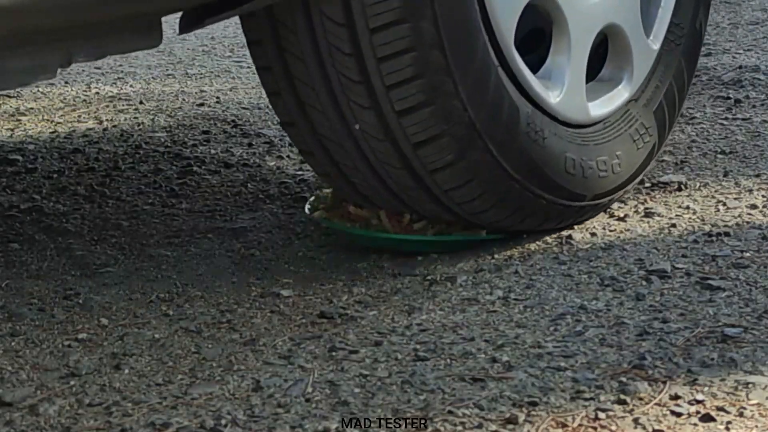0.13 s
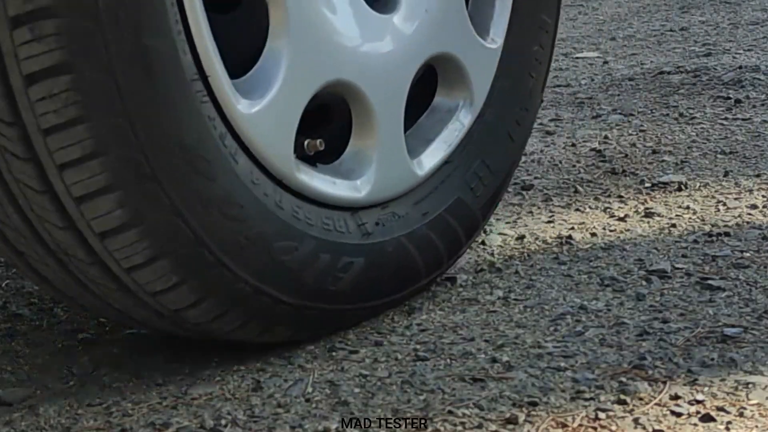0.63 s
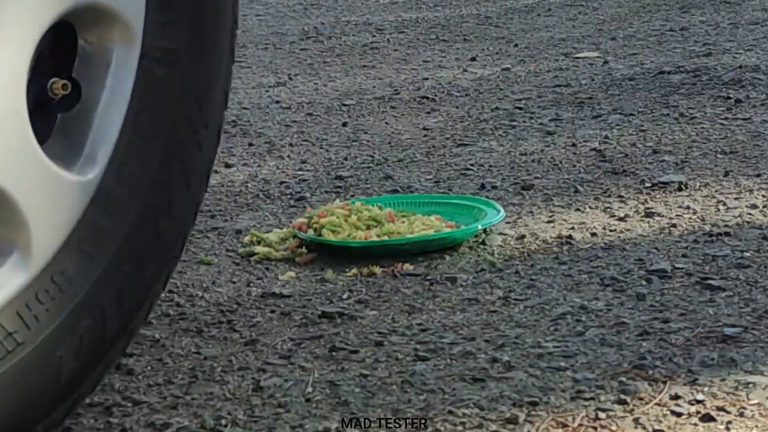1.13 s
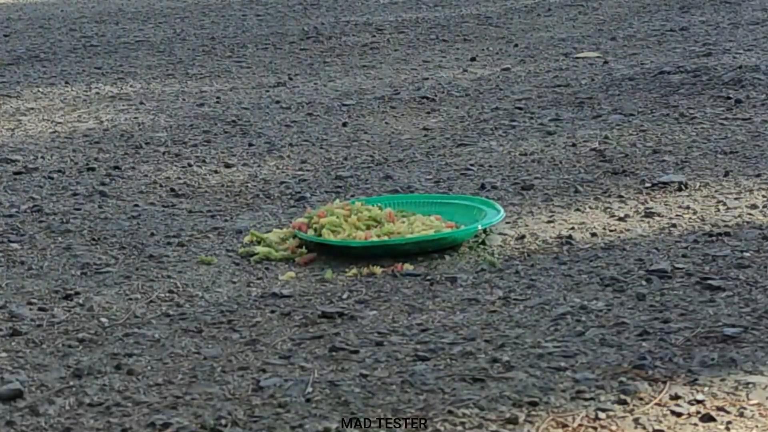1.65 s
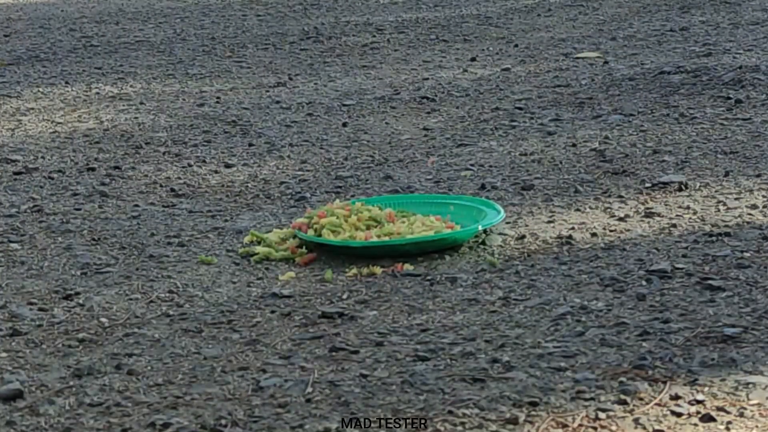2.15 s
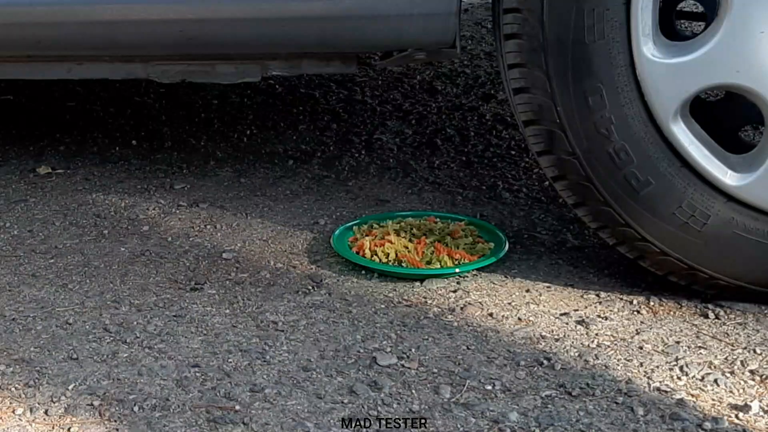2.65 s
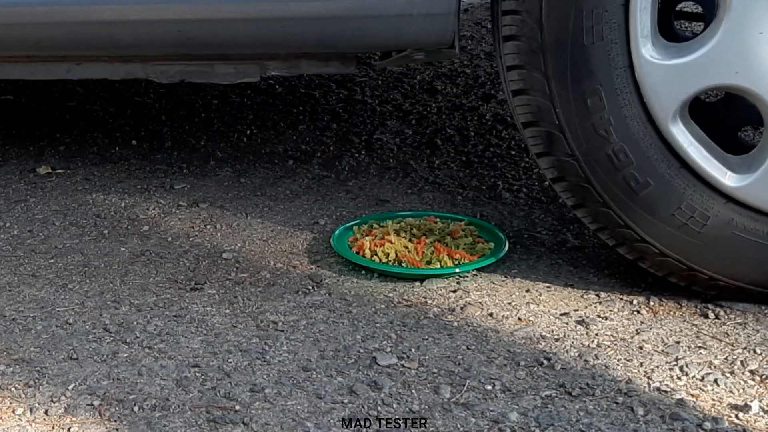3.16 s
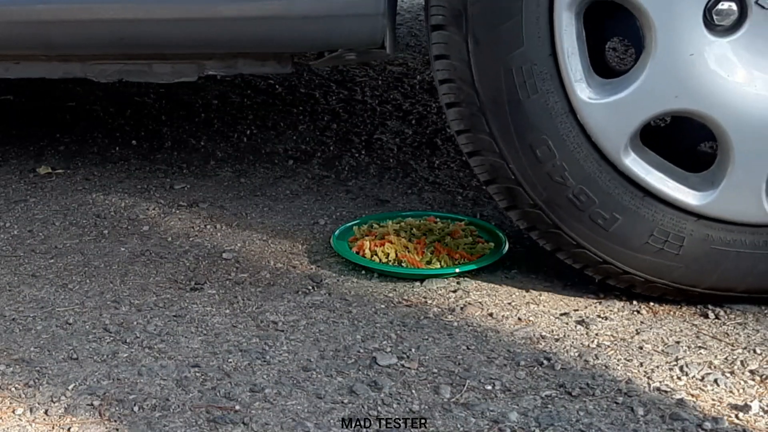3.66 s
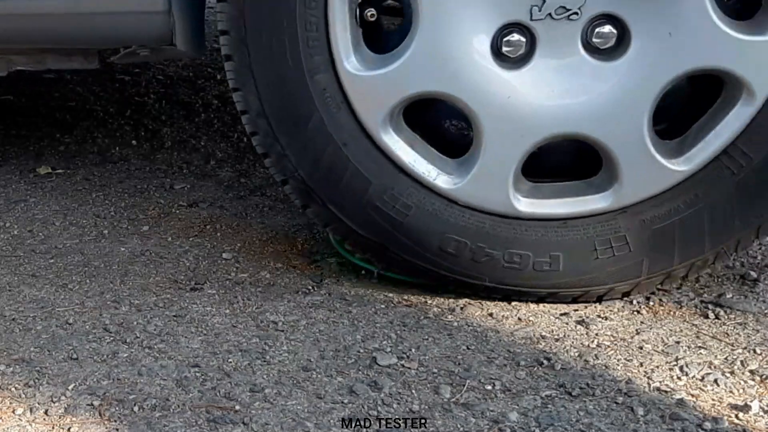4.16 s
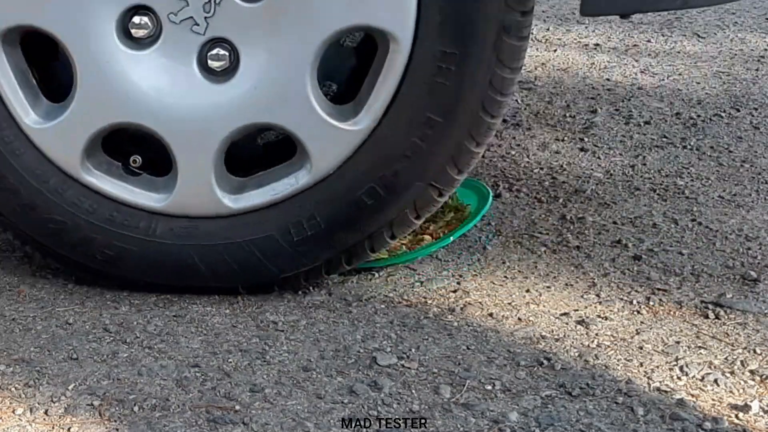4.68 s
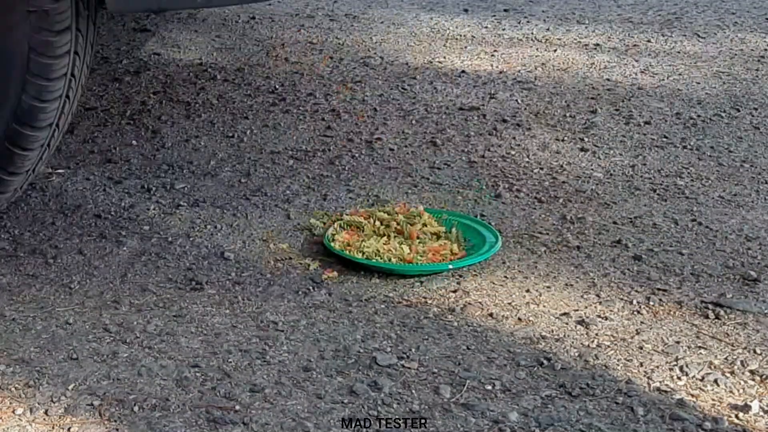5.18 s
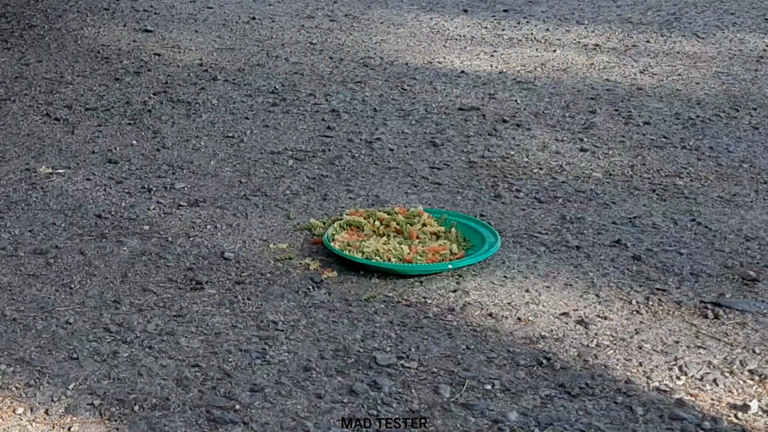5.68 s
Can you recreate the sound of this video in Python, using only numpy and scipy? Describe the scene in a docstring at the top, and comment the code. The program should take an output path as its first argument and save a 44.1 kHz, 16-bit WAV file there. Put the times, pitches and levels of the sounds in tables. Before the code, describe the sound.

Outdoors, close to the ground, a car idles low and soft while its tyre rolls slowly over gritty asphalt. Almost at once, from 0.03 to 0.55 s, dry pasta breaks under the tread: a dense, loud, brittle crackle packed with sharp snaps and hollow plastic knocks. It drops to coarse grit, with a brief crackling swell near 0.8 s, then sparse clicks leaning right; a very short, thin brake squeak comes at 1.2 s. Small grit ticks gather around 2.15 to 2.4 s. At about 2.5 s an abrupt cut makes everything quieter: dull engine rumble, faint hiss, barely audible high squeaks around 3.3 to 3.9 s and a few grit ticks. From 4.05 s the second plate is crushed, brighter and fiercer, with big snaps and a boxy ring until about 4.5 s. Crackles thin by 4.9 s, leaving tiny ticks and faint engine rumble to 5.8 s.

```python
"""A slow car rolls a tyre over a plastic plate of dry pasta on gritty asphalt, heard in two passes.
At the first spot the idling engine hums, and pasta crunches under the tread for the first half second:
noise-burst breaks and snaps ring the hollow plate. Sparse grit and a thin brake squeak follow.
From 2.485 s the second spot starts quieter, with faint squeaks and grit; the plate is crushed
at about 4.05 to 4.7 s, and the crackle thins out to the end."""
import sys
import numpy as np
from scipy import signal
from scipy.fft import irfft
from scipy.io import wavfile
from scipy.ndimage import uniform_filter1d, map_coordinates

SR = 44100
rng = np.random.default_rng(int(sys.argv[2]) if len(sys.argv) > 2 else 0)


def unload_wav(signal):
    """Save mono or channel-first audio to the path in sys.argv[1] as 16-bit WAV at rate SR, clipped to [-1, 1]."""
    wavfile.write(
        sys.argv[1],
        SR,
        np.round(np.clip(np.atleast_2d(signal).T, -1, 1) * 32767).astype(np.int16),
    )


def voltage_ratio(decibels):
    """Convert decibels (scalar or array-like) to amplitude ratios, 20 dB per decade."""
    exponent = np.asarray(decibels, float) / 20
    return 10 ** exponent


N = 256220
TIME = np.arange(N) / SR
SECOND_PASS_S = 2.485


def evened(x):
    """Scales to rms 1."""
    return x / np.sqrt(np.mean(x ** 2) + 1e-20)


def read_spectrum(points, hz):
    """Reads a spectrum on a log frequency axis."""
    f, value = np.transpose(points)
    return np.interp(np.log(hz + 1), np.log(f + 1), value)


def curves(tables):
    """Joins tables in time order and reads every column at each sample."""
    s, *columns = np.transpose(sorted(row for table in tables for row in table))
    return [np.interp(TIME, s, column) for column in columns]


def per_pass(make, tables):
    """Plays the first table up to the second pass and the second table from there."""
    return np.where(TIME < SECOND_PASS_S, make(tables[0]), make(tables[1]))


def add(mix, start_s, sound):
    """Mixes a sound in at its start time."""
    mix[round(start_s * SR):][:len(sound)] += sound


def resonate(x, hz, width):
    """A two-pole resonance of gain 1 at its centre."""
    return signal.lfilter(*signal.iirpeak(hz, hz / width, SR), x)


def steep(x, hz, width):
    """A resonance passed twice, for steep skirts."""
    return resonate(resonate(x, hz, width), hz, width)


def above(x, hz):
    """High-pass without delay."""
    return signal.sosfiltfilt(signal.butter(4, hz, "high", fs=SR, output="sos"), x)


# likeness of open air at the left and right microphones: (pitch_hz, likeness [-1 to 1])
AIR_LIKENESS = [(60, .96), (150, .92), (300, .65), (640, .2), (1400, -.2), (3000, 0)]


def air(points):
    """Open air as random short-time spectra with drifting patches, partly shared by both microphones."""
    hz = np.fft.rfftfreq(2048, 1 / SR)
    a, b, c, d, patches = rng.standard_normal((N // 512 + 5, 1025, 5)).T
    patches = evened(uniform_filter1d(uniform_filter1d(patches, 16, 0), 6, 1))
    same = np.clip(read_spectrum(AIR_LIKENESS, hz), -1, 1)[:, None]
    left = a + 1j * b
    right = same * left + np.sqrt(1 - same ** 2) * (c + 1j * d)
    level_db = read_spectrum(points, hz)[:, None] + 1.5 * patches
    spectra = np.array([left, right]) * voltage_ratio(level_db)
    return evened(signal.istft(spectra, nperseg=2048, noverlap=1536)[1][:, :N])


# colour of engine and open air, one list per pass: (pitch_hz, relative level_db per Hz)
AIR_COLOUR = [
    [(15, -47.5), (25, -41.5), (92, -1.5), (166, -7), (384, -3.5), (775, -21), (962, -9), (1290, -15),
     (4490, -25.5), (5570, -31.5), (8140, -27.5), (12500, -37), (16000, -60.5)],
    [(15, -69), (25, -38), (102, 3), (256, -12), (363, -8), (531, -22.5), (575, -7.5), (677, -19.5),
     (796, -12.5), (1130, -20), (1700, -21.5), (2550, -34), (16000, -73)],
]
# nearness of the engine, one list per pass: (time_s, level_db)
ENGINE_NEARNESS = [
    [(0, -43), (.34, -40.5), (.81, -43), (2.48, -41.5)],
    [(2.49, -48.5), (3.12, -47), (4.23, -46), (4.58, -52.5), (5.35, -56), (5.81, -48)],
]
# wavering engine tones: (pitch_hz, relative level_db)
ENGINE_TONES = [(91.5, -54.5), (113.0, -55.5), (226.1, -57), (290.7, -63.5), (366.1, -59.5), (576.0, -69.5)]


def engine():
    """Idle rumble with tones of narrow-band noise, which waver; its level follows the nearness."""
    hum = sum(voltage_ratio(db) * evened(resonate(rng.standard_normal(N), hz, 5.5)) for hz, db in ENGINE_TONES)
    # the side the car stands on: left-right dB, first and second pass
    pan_db = np.where(TIME < SECOND_PASS_S, -1, 3) * np.array([[.5], [-.5]])
    rumble = voltage_ratio(-1.0) * per_pass(air, AIR_COLOUR) + voltage_ratio(-5.0) * evened(hum)
    return voltage_ratio(curves(ENGINE_NEARNESS)[0] + pan_db) * rumble


# where the tyre is, one list per pass: (time_s, left_late_ms, left_minus_right_db)
TYRE_PLACE = [
    [(0, 0.032, -0.5), (.9, 0.051, -1), (1.1, .22, -11.5), (1.6, .4, -5.5), (2.48, .5, -2.5)],
    [(2.49, .5, -5), (3.4, 0.505, -2.5), (3.7, .05, 3.5), (4.3, 0.075, 3), (4.8, .011, 2), (5.2, -.11, 1.5),
     (5.81, -.51, 3)],
]


def placed(x, lean=1.):
    """Places sound at the tyre by the left microphone's delay and a level tilt, scaled by lean."""
    late_ms, pan_db = curves(TYRE_PLACE)
    left = map_coordinates(x[0], [np.arange(N) - late_ms * SR / 1000], order=3)
    return np.array([left * voltage_ratio(lean * pan_db / 2), x[1] * voltage_ratio(-lean * pan_db / 2)])


# how hard the tread grinds, one list per pass: (time_s, crackle level_db)
# grit while rolling, a plateau on the pasta, a second swell as the tread lifts off
TREAD_LOAD = [
    [(0, -45.5), (.02, -29.5), (.025, -20), (.044, -25), (.065, -18), (.135, -21), (.17, -19), (.43, -21),
     (.462, -23.5), (.48, -19.5), (.53, -28), (.57, -34), (.6, -36), (.66, -32), (.71, -35), (.76, -36.5),
     (.812, -24.5), (.885, -34), (.96, -47), (1.15, -56.5), (1.45, -52.5), (1.7, -46.5), (1.95, -47),
     (2.2, -48), (2.33, -50.5), (2.45, -50), (2.48, -53)],
    [(2.49, -71), (3.0, -79.5), (3.3, -77), (3.46, -65.5), (3.55, -65.5), (3.565, -49.5), (3.63, -56.5),
     (3.67, -66), (3.7, -53), (3.8, -57), (3.95, -57.5), (3.984, -33), (4.028, -48), (4.046, -23),
     (4.06, -28.5), (4.1, -21.5), (4.31, -20.5), (4.4, -26), (4.45, -24), (4.485, -31), (4.51, -28.5),
     (4.58, -37.5), (4.7, -42), (4.8, -37.5), (4.82, -30), (4.89, -39.5), (4.94, -45.5), (5.0, -60.5),
     (5.3, -61), (5.6, -57), (5.7, -54.5), (5.81, -52)],
]
# the tread touches the plate: (start_s, end_s)
PLATE_CONTACT = [(.03, 0.681), (4.049, 4.71)]


def tread():
    """Crackle level, and the plate ring, grit thud and finest snaps that follow from it."""
    load_db = curves(TREAD_LOAD)[0]
    second = (TIME >= SECOND_PASS_S).astype(int)
    over_full_db = load_db + 20  # crackle is at -20 dB with the whole plate under the tread

    def following(level_db, slope):
        """Level at full load, and dB per dB of load, for each pass."""
        return np.take(level_db, second) + np.take(slope, second) * over_full_db

    plate_db = following([-26.5, -23.5], [0.68, 0.98])
    grit_db = following([-40.5, -41], [.25, 0.59])
    fine_db = following([-26.5, -23.5], [1.434, 1.27])  # the finest snaps need weight
    # the plate is pinned and freed as it buckles, so its ring comes and goes
    flex_n = round(.02 * SR)
    flex = evened(uniform_filter1d(uniform_filter1d(rng.standard_normal(N), flex_n), flex_n))
    on_s, off_s = .09, 0.012  # the ring fades in within the contact and out just after it
    touch = sum(np.clip(np.minimum((TIME - start) / on_s, (end - TIME) / off_s + 1), 0, 1)
                for start, end in PLATE_CONTACT)
    ringing = touch * voltage_ratio(plate_db + 2 * flex)
    return load_db, ringing, voltage_ratio(grit_db), np.maximum(fine_db, -94)


def ring(x, modes):
    """The plate's modes, rung by blows; two passes narrow a resonance, so each is made wider."""
    return sum(voltage_ratio(db) * evened(steep(x, hz, 1.57 * width)) for hz, width, db in modes)


def coloured(x, points):
    """Applies a spectrum and evens the level."""
    hz = np.fft.rfftfreq(1024, 1 / SR)
    taps = np.roll(irfft(voltage_ratio(read_spectrum(points, hz))), 512) * np.hanning(1024)
    return evened(signal.oaconvolve(x, taps[None], "same", axes=1))


# colour of breaking pasta and grit, one list per pass: (pitch_hz, relative level_db per Hz)
BREAK_COLOUR = [
    [(710, -24.5), (1200, -6), (1750, -5.5), (2300, -9), (4080, -3), (5970, -4.5), (7170, -8), (8260, -4.5),
     (11300, -7.5), (16000, -19)],
    [(710, -28.5), (1200, -27.5), (1380, -1), (2180, -6), (2560, -3.5), (4500, 0.5), (7740, -8),
     (8630, -16.5), (11800, -9), (16000, -16.5)],
]
# modes of the plate and the hollow under the car, one list per pass:
# (pitch_hz, width_hz, relative level_db)
PLATE_MODES = [
    [(287, 48, -6.5), (468, 230, -6.5), (772, 320, -1.5), (978.5, 88, -9)],
    [(420, 304, -11), (528, 65, -1.5), (610, 41, -8), (961, 47, -30), (969, 62, 3.5)],
]


def crunch(kinds=range(120)):
    """Countless small breaks, denser under more load, each kind from its own spot across the tread."""
    load_db, ringing, thudding, fine_db = tread()
    per_s = np.clip(2500 * voltage_ratio(0.34 * (load_db + 23.0)), 700, 6000)
    # pieces give way in clumps, loose grit more so
    clumps = evened(uniform_filter1d(uniform_filter1d(rng.standard_normal(N), 500), 500))
    per_s_now = per_s * np.exp(np.interp(load_db, [-55, -25], [.55, .2]) * clumps)
    size_draw, break_draw, kind_draw = rng.random((N, 3)).T
    spread_db = np.interp(load_db, [-55, -25], [3.0, 4.5])  # heavy load breaks bigger pieces
    happens = break_draw < per_s_now / SR
    size = voltage_ratio(-spread_db * np.log(1 - .98 * size_draw)) * happens / np.sqrt(per_s)
    size /= voltage_ratio(1.4 * spread_db)

    kind = (kind_draw * len(kinds)).astype(int)
    breaks = np.zeros((2, N))
    t = np.arange(800) / SR
    for k in kinds:
        spot, length = rng.random(2)
        hz = 1200 * 12 ** (k / len(kinds))
        shape = rng.standard_normal(800) * voltage_ratio(-60 * t / (.004 + .014 * length))
        shape = evened(shape) + 0.37 * evened(resonate(shape, hz, 0.92 * hz))
        one = signal.oaconvolve(size * (kind == k), shape)[:N]
        breaks += [np.roll(one, round(7 * (spot - .5))), one]  # up to about 3 samples between ears

    brittle = per_pass(lambda points: coloured(breaks, points), BREAK_COLOUR)
    fine, bright = above(brittle, 8200), above(brittle, 3700)
    bright_gain = voltage_ratio(0.53 * (fine_db - load_db + 3.0))  # dulls along with the finest snaps
    body = brittle - bright + bright_gain * (bright - fine)
    plate = per_pass(lambda modes: evened(ring(size, modes)), PLATE_MODES)  # the whole plate rings as one
    thud = evened(steep(size, 650, 1100))  # the dull thud of grit
    hollow = ringing * plate + thudding * thud
    # the hollow sound is the least one-sided
    return (placed(voltage_ratio(load_db) * evened(body))
            + placed(voltage_ratio(fine_db) * evened(fine), lean=0.8)
            + placed([hollow] * 2, lean=.35))


def burst(hz, width, t60, noise, click=5.6):
    """A break: a click of a cycle or two, then a weaker rattle of splinters dying around one pitch."""
    t = np.arange(len(noise)) / SR
    x = steep(noise * voltage_ratio(-60 * t / t60) + click * (t == 0), hz, width)
    return x / abs(x).max()


# loud single snaps: (start_s, crack level_db, crack pitch_hz, knock level_db over crack, knock pitch_hz)
LOUD_SNAPS = [(0.0231, -17.5, 3970, -18, 1030), (0.0493, -7, 3130, -21.5, 1300),
              (0.0761, -6, 1750, -12, 1240), (0.0984, -6.5, 3640, -32, 1130), (0.1536, -15, 3610, -8, 713),
              (0.1724, -6.5, 3410, -5.5, 840), (0.1907, -5.5, 2960, -7.5, 930),
              (0.2063, -12, 1690, -26, 891), (0.2279, -25.5, 1820, -2, 1140),
              (0.2324, -17, 2960, 10.5, 880), (0.2392, -7, 2920, -19.5, 724),
              (0.2508, -7.5, 1770, -19, 861), (0.2794, -18, 4000, -9, 964), (0.2904, -9, 3690, -15, 939),
              (0.305, -11, 3230, -2.5, 695), (0.3251, -48, 3350, 3, 778), (0.3444, -16.5, 4410, -8.5, 745),
              (0.3624, -7.5, 4330, -2, 760), (0.3804, -14.5, 1710, -9.5, 729),
              (0.4033, -7.5, 4360, -8.5, 666), (0.4264, -0.5, 5990, -12.5, 799),
              (0.4777, -11.5, 1740, 1.5, 750), (0.4924, -9.5, 1670, -14, 435),
              (0.4984, -13, 3320, -11, 880), (0.5144, -28.5, 1390, 19, 790), (0.5746, -16, 1740, -2.5, 990),
              (0.5858, -17, 1380, 1, 435), (0.625, -26, 3890, -13, 1230), (0.6334, -25, 1300, -1, 1220),
              (0.6536, -20, 1620, -0.5, 600), (0.6804, -21, 1550, -7, 624), (0.8021, -13.5, 3310, -11, 600),
              (0.8204, -21, 3130, -28, 1130), (0.8684, -24, 1320, 7.5, 740), (0.9892, -28, 1760, -5.5, 735),
              (1.0495, -32.5, 1620, -1, 1180), (1.098, -37.5, 4170, 3, 566), (1.1382, -37, 1300, 13, 1000),
              (1.1443, -37.5, 1500, 19.5, 980), (1.2048, -32, 2660, -22, 476),
              (1.3203, -26.5, 6790, -17, 431), (1.3346, -26, 1370, -10, 463),
              (1.3533, -29.5, 2670, -21, 1170), (1.4454, -37, 2400, -6, 956), (1.5806, -37, 2120, -7, 506),
              (1.6591, -28, 2210, 4, 980), (1.719, -30.5, 1850, 0, 593), (1.8816, -27, 1650, 0, 1010),
              (1.9644, -25.5, 1790, -6, 630), (2.0054, -33, 2080, -18, 441), (2.139, -24, 4540, -15, 589),
              (2.1497, -25, 1750, -12, 460), (2.1635, -15.5, 3110, -4.5, 1320),
              (2.2964, -29, 1760, -5, 517), (2.3216, -17, 1760, -2.5, 500), (2.3314, -24, 2320, -4, 480),
              (2.3364, -25.5, 2380, 15.5, 950), (2.3438, -20.5, 1630, -8, 434),
              (2.3527, -18, 1690, -10, 1300), (2.3564, -34, 2080, 14, 732), (2.3643, -26.5, 1350, 3, 730),
              (2.438, -48, 1620, 2, 468), (2.4767, -27, 1300, 2, 1210), (3.0957, -57, 1530, 18, 598),
              (3.1063, -45, 1490, 14, 813), (3.117, -55.5, 1450, 16.5, 824), (3.1274, -55, 1780, 20, 805),
              (3.1392, -52, 1300, 11, 476), (3.5608, -39, 2950, -11, 571), (3.591, -42, 5280, -11, 713),
              (3.6174, -51, 1340, -4, 581), (3.696, -45, 1740, -9, 606), (3.7541, -27.5, 1620, -7, 620),
              (3.7727, -46, 1690, 2, 487), (3.829, -41, 1410, 0, 972), (3.9305, -37, 2300, -14, 1000),
              (3.9706, -37, 1450, 4, 961), (3.9821, -34, 4040, 12, 980), (4.0436, -21.5, 1490, -35, 1000),
              (4.0707, -8, 1470, -23, 1040), (4.0928, -2.5, 2030, -21.5, 990),
              (4.1034, 2.5, 3810, -18.5, 480), (4.1171, -9.5, 4870, -16, 500),
              (4.1314, 2.5, 4480, -19, 970), (4.1772, -9.5, 1430, -10, 990), (4.2002, -19, 4440, -30, 929),
              (4.2143, -5, 3450, -10.5, 940), (4.2238, -8.5, 3460, -9, 970), (4.2528, -14, 4170, 3.5, 961),
              (4.2731, -4, 2620, -27, 980), (4.2887, -8.5, 3980, -5, 956), (4.3074, 2, 4390, -26, 920),
              (4.3272, -6.5, 4310, -12, 520), (4.3465, 6, 4330, -11.5, 910), (4.3674, -22, 4680, 11.5, 940),
              (4.3859, -2, 5410, -17, 980), (4.4486, -9, 3110, -12, 982), (4.4967, -24.5, 2400, 10, 900),
              (4.512, -20, 3490, 2, 940), (4.5354, -33.5, 2590, 16, 930), (4.5945, -18.5, 3430, -7, 982),
              (4.6047, -26.5, 1360, 0, 528), (4.6461, -17, 4090, -9, 970), (4.6743, -28.5, 3490, 4.5, 900),
              (4.6862, -17, 5040, -9.5, 587), (4.7013, -13, 5030, -16.5, 587),
              (4.7393, -22.5, 1480, -31, 966), (4.7581, -22, 3490, -32, 931),
              (4.8146, -23.5, 3400, -35, 1120), (4.8384, -21.5, 3030, -29, 969),
              (4.8904, -27, 3130, 1.5, 915), (5.0118, -39, 2040, -2, 570), (5.096, -44, 3950, -5, 592),
              (5.1614, -40.5, 1300, 8, 565), (5.1711, -39, 1520, 5.5, 586), (5.229, -47.5, 4140, -20, 487),
              (5.3438, -36.5, 3510, -16, 1100), (5.3594, -36.5, 1750, -4.5, 1040),
              (5.391, -41, 4440, -20, 1000), (5.468, -49, 3860, -19, 431), (5.5174, -47, 2030, -13, 571),
              (5.627, -41, 2140, -1, 1150), (5.684, -33, 2250, -1, 1025), (5.7423, -36, 2570, 2.5, 1080)]


def snaps():
    """Single pieces and stones crack loudly over a short hollow knock."""
    out = np.zeros(N + 3000)
    t = np.arange(3000) / SR
    for start_s, db, hz, knock_db, knock_hz in LOUD_SNAPS:
        noise = rng.standard_normal((3, 3000))
        second = int(start_s >= SECOND_PASS_S)
        crack = burst(hz, 0.92 * hz, 0.02, noise[0])
        # splinters: level at a 3 kHz crack per pass, and 0.5 dB more per octave above
        splinter_db = [-13, -27.5][second] + 0.5 * np.log2(hz / 3000)
        crack += voltage_ratio(splinter_db) * burst(8800, 7000, 0.016, noise[1], click=3.1)
        # the blow behind a crack: a broad thud that also sets the modes going
        blow = steep(noise[2] * voltage_ratio(-60 * t / 0.016) + 6.7 * (t == 0), knock_hz, 0.69 * knock_hz)
        modes = sum(voltage_ratio(mode_db) * resonate(blow, mode_hz, width)
                    for mode_hz, width, mode_db in PLATE_MODES[second])
        knock = evened(blow) + voltage_ratio(2.5) * evened(modes)
        # the tyre wall thumps under every knock
        thump = steep(noise[2] * voltage_ratio(-60 * t / .03), 270, 220)
        knock += voltage_ratio([-4.5, -13][second]) * evened(thump)
        add(out, start_s, voltage_ratio(db) * (crack + voltage_ratio(knock_db) * knock / abs(knock).max()))
    return placed([out[:N], out[:N]])


def underside(x):
    """Short treble scatter between road and car floor, different at each ear; it stops at the cut."""
    t = np.arange(3000) / SR
    signs = rng.choice([-1., 1.], (2, 3000))
    tail = signs * (rng.random((2, 3000)) < .1) * voltage_ratio(-60 * t / .045) * (t > .0006)
    tail = signal.lfilter(*signal.butter(1, 900, "high", fs=SR), tail)
    tail /= np.linalg.norm(tail, axis=1, keepdims=True)
    sources = [x, x * (TIME >= SECOND_PASS_S)]
    return per_pass(lambda part: signal.oaconvolve(part, tail, axes=1)[:, :N], sources)


# brake squeaks: (start_s, length_s, settled pitch_hz, level_db, fade_db_per_s)
BRAKE_SQUEAKS = [(1.193, 0.052, 9000, -51.5, 450), (3.328, 0.099, 6660, -66.5, 30),
                 (3.63, .19, 8850, -72, 70), (3.814, .13, 8800, -70, 110)]


def squeaks():
    """Brake pads sing thin, trembling tones that swell, start a little sharp and settle."""
    out = np.zeros(N)
    bite_s = 0.011
    for start_s, length, hz, db, fade_db in BRAKE_SQUEAKS:
        t = np.arange(0, length, 1 / SR)
        tremble = 1 + 0.36 * evened(uniform_filter1d(rng.standard_normal(N), 200))[:len(t)]
        swell = np.clip(np.minimum(t, length - t) / bite_s, 0, 1) ** 2
        swell *= voltage_ratio(db - fade_db * np.maximum(t - bite_s, 0))
        cycles = hz * np.cumsum(1 + 0.024 * np.exp(-t / .018)) / SR
        add(out, start_s, np.sqrt(2) * tremble * swell * np.sin(2 * np.pi * cycles))
    return out * voltage_ratio([[-1.5], [1.5]])  # stronger on the right


def microphone_hiss():
    """Steady white noise, independent in each microphone."""
    return voltage_ratio(-73.5) * rng.standard_normal((2, N))


def scene():
    """Breaking, its scatter, engine, brakes and microphone noise."""
    breaking = crunch() + snaps()
    scatter = voltage_ratio(-5) * underside(breaking)
    return breaking + scatter + engine() + squeaks() + microphone_hiss()


def roll_off(x):
    """The treble ends steeply here."""
    return signal.sosfilt(signal.butter(12, 16650, fs=SR, output="sos"), x)


def record(dry):
    """Soft overload rounds the peaks, then the band ends near 16.3 kHz."""
    overloaded = np.tanh(dry / 1.161) * 1.072
    band_limit = signal.firwin(255, 16300, fs=SR)[None]
    mix = signal.oaconvolve(overloaded, band_limit, "same", axes=1)
    return roll_off(mix)


dry = scene()
out = record(dry)
unload_wav(out)
```